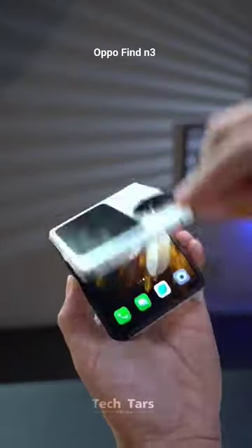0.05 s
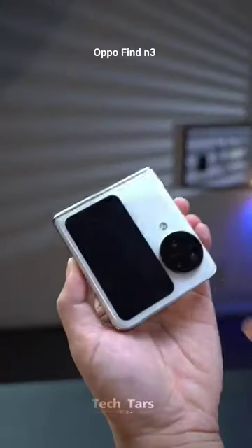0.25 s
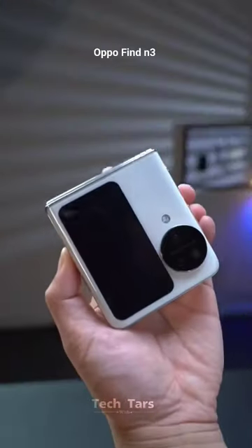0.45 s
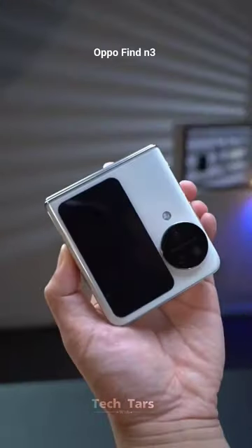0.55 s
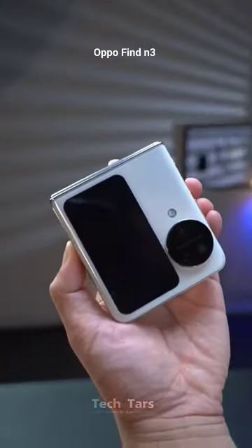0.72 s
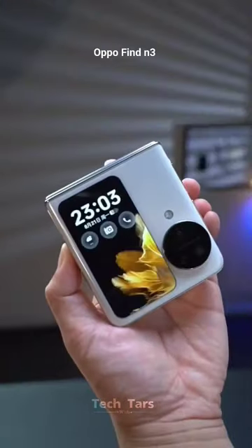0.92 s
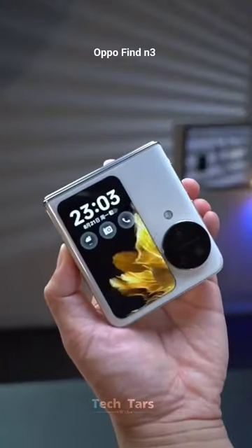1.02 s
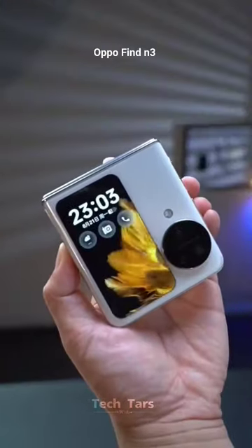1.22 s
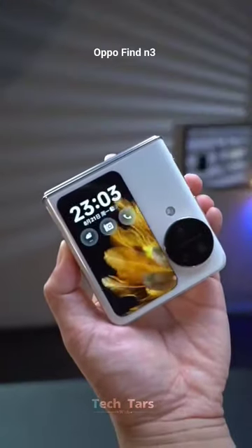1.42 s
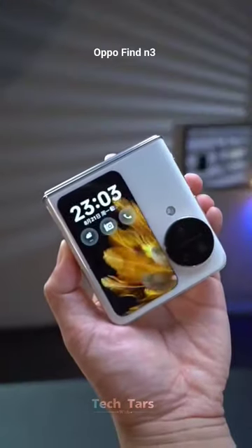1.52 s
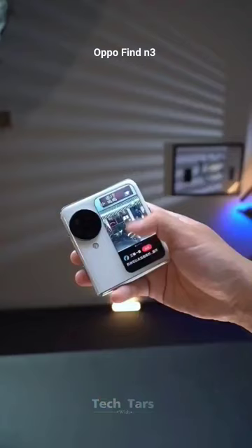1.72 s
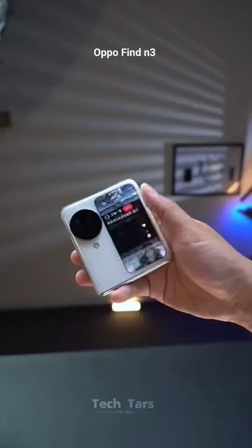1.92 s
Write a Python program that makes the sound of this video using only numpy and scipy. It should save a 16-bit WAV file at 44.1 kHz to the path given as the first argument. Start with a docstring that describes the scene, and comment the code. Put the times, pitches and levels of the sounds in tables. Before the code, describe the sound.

A folding phone snaps shut at about 0.25 seconds, close to the microphone: tiny hinge ticks and a thin click run straight into one loud, sharp clap. A small room's echo dies away by about 0.6 seconds. From 1.2 to 1.8 seconds come very soft hand bumps and rubs, then a barely audible finger squeak near 1.9. Faint rumble, hum and hiss lie underneath throughout.

```python
"""A folding phone is flipped shut close to a microphone. Fingers rub the case, the hinge scrapes and ticks
twice and one edge touches. Air puffs from the closing gap, which pops, and the halves clap together, ringing in
damped modes that just overload the recorder. The phone settles with a last tick while a small room
reverberates. Later come soft bumps and rubs of the hands and one faint squeak on the glass. A low rumble, a
faint hum and a hiss lie under it all."""
import sys
import numpy as np
from scipy import signal
from scipy.fft import rfft, irfft, next_fast_len
from scipy.io import wavfile
from scipy.ndimage import map_coordinates

SR = 44100
rng = np.random.default_rng(int(sys.argv[2]) if len(sys.argv) > 2 else 0)


def file_out(sig):
    """Save sig as 16-bit WAV at sys.argv[1]."""
    # one column per channel
    cols = np.atleast_2d(sig).T
    # limit, then scale
    lim = np.clip(cols, -1, 1)
    pcm = np.round(lim * 32767).astype(np.int16)
    wavfile.write(sys.argv[1], SR, pcm)


N = 85995
T = np.arange(N) / SR
NOISE_TOP_HZ = 13300  # band limit of echoes, rubs and background noise


def amp(db):
    """Decibels to amplitude ratio."""
    return 10 ** (np.asarray(db) / 20)


def unit(x):
    """Normalisation to rms 1."""
    return x / np.sqrt(np.mean(x ** 2) + 1e-20)


def along(points, hz):
    """Interpolation of (frequency, value) points on a log frequency axis."""
    freqs, values = np.transpose(points)
    return np.interp(np.log(hz + 1), np.log(freqs + 1), values)


def filtered(x, response):
    """Linear filtering: the spectrum times a frequency response."""
    size = next_fast_len(N + SR // 2)
    return irfft(rfft(x, size) * response(np.fft.rfftfreq(size, 1 / SR)), size)[..., :N]


def wobble(rate):
    """Smooth random modulation: a spline through rate knots a second."""
    knots = rng.standard_normal(int(N * rate / SR) + 4)
    return map_coordinates(knots, [np.arange(N) * rate / SR])


def swell(centre, half):
    """A Gaussian pulse, down to 1/e at half seconds from its centre."""
    return np.exp(-((T - centre) / half) ** 2)


def decay(t, t60):
    """Exponential damping: 60 dB in t60 seconds."""
    return np.exp(-np.log(1000) * t / t60)


def stereo(mid, side):
    """Sum and difference give left and right."""
    return np.array([mid + side, mid - side])


def ring(start, modes, attack):
    """Free vibration after one excitation: a sum of damped sinusoids."""
    t = np.maximum(T - start, 0)
    vibration = sum(amp(db) * decay(t, t60) * np.sin(2 * np.pi * hz * t) for hz, db, t60 in modes)
    return (1 - np.exp(-t / attack)) * vibration


def crack(start, db, t60, side_db=-6):
    """Contact noise: a broadband burst as two hard faces meet."""
    mid, side = rng.standard_normal((2, N))
    envelope = amp(db) * (T > start) * decay(np.maximum(T - start, 0), t60)
    return envelope * stereo(mid, amp(side_db) * side)


TOUCH_S, CLAP_S = .2286, .2404
# resonance of the air gap (frequency [Hz], relative level [dB], T60 [s])
GAP_MODES = [(1062, 0.5, 0.0066)]
# modes of the closed body (frequency [Hz], relative level [dB], T60 [s])
BODY_MODES = [(510, -15, 0.0079), (1896.7, -7.5, .0045), (3420, -17, .0055), (3840, -13.5, .0046),
              (6140, -21.5, .003), (9840, -30.5, 0.0031)]


def clap():
    """Expelled air puffs and the gap resonates; impact then excites body modes, damped by the hand."""
    contact_s = CLAP_S + .0005
    puff = amp(-9) * swell(CLAP_S, half=.0004)
    pop = ring(CLAP_S, GAP_MODES, attack=.00002)
    knock = ring(contact_s, BODY_MODES, attack=.00005) + crack(contact_s, db=-30.5, t60=.007)
    return amp(6) * (puff - pop + knock)


# modes of the edge that lands first (frequency [Hz], relative level [dB], T60 [s])
EDGE_MODES = [(1400, 1, .0075), (1850, -7, 0.0083), (2900, -14, 0.008), (4150, -11.5, .004),
              (5800, -20.5, .003), (11400, -21.5, .003)]


def touch():
    """A small source radiates bass poorly, so the edge's impact is a thin tick."""
    tick = ring(TOUCH_S, EDGE_MODES, attack=.00046) + crack(TOUCH_S, db=-26, t60=.0093)
    bass_cut = signal.butter(4, 1050, "high", fs=SR, output="sos")
    return amp(-4.5) * signal.sosfilt(bass_cut, tick)


# light impacts in the hinge and frame (time [s], level [dB])
HINGE_TICKS = [(0.2085, -34.5), (0.2212, -25.5), (0.2630, -22)]
# modes of each tick (frequency [Hz], relative level [dB], T60 [s])
HINGE_MODES = [(1259, -11, .008), (2410, -10.5, 0.0066), (3722, -3, .005), (6200, -8, .003),
               (9500, -19, 0.0035)]


def hinge():
    """Impulse excitation: each tick rings the same modes as the phone folds and settles."""
    return sum(amp(db) * (ring(s, HINGE_MODES, attack=.0001) + crack(s, db=-17.5, t60=.004))
               for s, db in HINGE_TICKS)


def narrow(hz, half_width_hz):
    """Resonance: white noise through one narrow peak, at rms 1."""
    noise = rng.standard_normal(N)
    return unit(filtered(noise, lambda f: 1 / (1 + ((f - hz) / half_width_hz) ** 2)))


# fingers rubbing the case and, just before the snap, the hinge scraping (time [s], half length [s], level [dB])
RUBS = [(.03, 0.084, -73.5), (0.187, 0.15, -62), (.22, .013, -54), (1.48, .05, -69),
        (1.552, .02, -65.5), (1.76, .045, -68.5)]
# spectrum of skin friction (frequency [Hz], relative density [dB])
SKIN_SPECTRUM = [(500, -12), (1500, -1.5), (3200, -1), (5500, -3), (13000, -7)]
# dull bumps of the moving hands (time [s], half length [s], level [dB])
HAND_BUMPS = [(0.13, 0.014, -53), (1.245, 0.019, -54.5), (1.441, .025, -50), (1.565, 0.025, -52),
              (1.65, 0.026, -49.5), (1.775, .035, -55.5)]


def fingers():
    """Friction gives broadband rubs of the fingers and a scrape of the hinge, and a narrowband squeak on the
    glass; the hands bump."""
    strokes = sum(amp(db) * swell(s, half) for s, half, db in RUBS)
    rubs = strokes * amp(2 * wobble(140)) * coloured_noise(SKIN_SPECTRUM)
    jolts = sum(amp(db) * swell(s, half) for s, half, db in HAND_BUMPS)
    bumps = jolts * narrow(hz=55, half_width_hz=12.4)
    squeak = amp(-71.5) * swell(1.915, half=.052) * narrow(hz=3630, half_width_hz=120)
    return rubs + bumps + squeak


WALL_S, BUILD_S = .002, .009  # delay of the first reflection, time for the echoes to thicken
# reverberation time (frequency [Hz], T60 [s])
REVERB_TIMES = [(100, .28), (400, .39), (750, .37), (1050, .42), (1600, .38), (2500, .35), (5000, .33),
                (12000, .38)]
# colour of the reverberation (frequency [Hz], relative gain [dB])
REVERB_COLOUR = [(80, -2.5), (200, 4.5), (320, 7), (430, 13), (600, 14), (820, 16), (1020, 20.5),
                 (1450, 15), (2500, 15), (3600, 8), (4600, -1), (5800, -14), (8000, -19), (13000, -25)]


def echoes(start):
    """The diffuse field of one blow: noise that builds up, then decays at each band's own rate."""
    hz, t, spectrum = signal.stft(rng.standard_normal(N), SR, nperseg=256)
    damping = decay(np.maximum(t - start, 0), along(REVERB_TIMES, hz)[:, None])
    tail = signal.istft(spectrum * damping, SR, nperseg=256)[1][:N]
    tail *= 1 - np.exp(-np.maximum(T - start - WALL_S, 0) / BUILD_S)
    tail /= np.linalg.norm(tail)
    return filtered(tail, lambda f: amp(along(REVERB_COLOUR, f)) * (f < NOISE_TOP_HZ))


# prominent room modes (frequency [Hz], level [dB], T60 [s])
STANDING_WAVES = [(404, -28, .3), (772, -34, .27), (940, -33, .33), (992, -26, .37), (1131, -31, .34),
                  (1410, -37, .35), (1625, -37, .28), (2087, -37, .29), (2498, -39, .3), (2692, -38, .28)]
# stereo width of the clap's echoes (frequency [Hz], side over mid [dB])
REVERB_WIDTH = [(500, -48.5), (2000, -43.5), (5000, -18), (10000, -8)]


def room(touch_db=-12, clap_db=3):
    """Reverberation, nearly mono, follows both blows; the clap also excites standing waves."""
    mid = amp(touch_db) * echoes(TOUCH_S) + amp(clap_db) * echoes(CLAP_S)
    mid += ring(CLAP_S + WALL_S, STANDING_WAVES, attack=.018)
    side = amp(clap_db) * filtered(echoes(CLAP_S), lambda hz: amp(along(REVERB_WIDTH, hz)))
    return stereo(mid, side)


# stereo width of steady noise (frequency [Hz], side over mid [dB])
NOISE_WIDTH = [(60, -20.5), (110, -19), (200, -17.5), (380, -11), (700, -14), (1290, -9.5), (2380, -9.5),
               (4400, -7.5), (8120, -0.5), (15000, -7)]


def coloured_noise(spectrum):
    """Partly coherent stereo noise of rms 1: nearly mono in the bass, wider in the treble."""
    colour = lambda hz: amp(along(spectrum, hz)) * (hz < NOISE_TOP_HZ)
    mid = filtered(rng.standard_normal(N), colour)
    side = filtered(rng.standard_normal(N), lambda hz: colour(hz) * amp(along(NOISE_WIDTH, hz)))
    return unit(stereo(mid, side))


# the room's rumble (frequency [Hz], relative density [dB])
RUMBLE_SPECTRUM = [(12, -36), (20, -14), (54, -0.5), (70, -8), (86, -8.5), (136, -10), (172, -9),
                   (300, -20.5), (390, -50), (660, -120)]
# the even hiss (frequency [Hz], relative density [dB])
HISS_SPECTRUM = [(150, -30.5), (250, -2.5), (320, -2.5), (354, -6), (476, -2.5), (553, -6), (600, -5.5),
                 (822, -7.5), (1400, -14.5), (13000, -21)]


def background(hum_hz=175.3):
    """The noise floor: random modulation makes a hum waver and a rumble heave under a stationary hiss."""
    hum = amp(-71 + 3 * wobble(17)) * np.sin(2 * np.pi * hum_hz * T + wobble(22))
    rumble = amp(-59 + 1.1 * wobble(9)) * coloured_noise(RUMBLE_SPECTRUM)
    hiss = amp(-61.5) * coloured_noise(HISS_SPECTRUM)
    return rumble + hum + hiss


def scene():
    """Superposition of the phone in the centre, the hands, the room and the background."""
    return hinge() + touch() + clap() + fingers() + room() + background()


def record(dry):
    """Saturation flattens the loudest swings; a low-pass rolls the treble off to the band limit."""
    ceiling, roll_off_hz, top_hz = .95, 13600, 16200
    clipped = dry / (1 + np.abs(dry / ceiling) ** 8) ** (1 / 8)
    return filtered(clipped, lambda hz: (hz < top_hz) / (1 + (hz / roll_off_hz) ** 24))


dry = scene()
out = record(dry)
file_out(out)
```